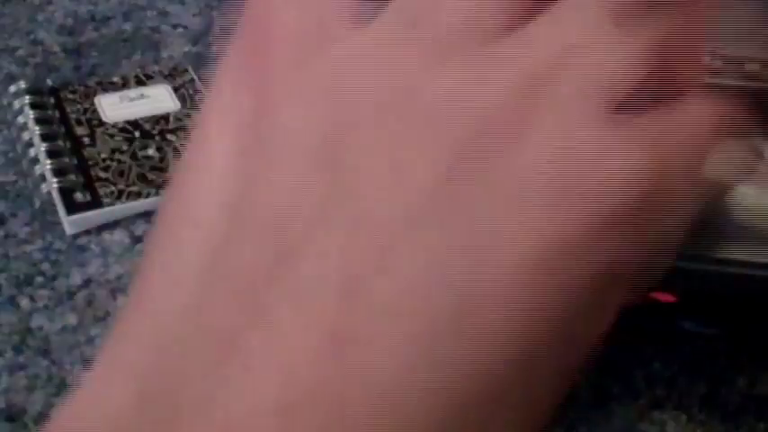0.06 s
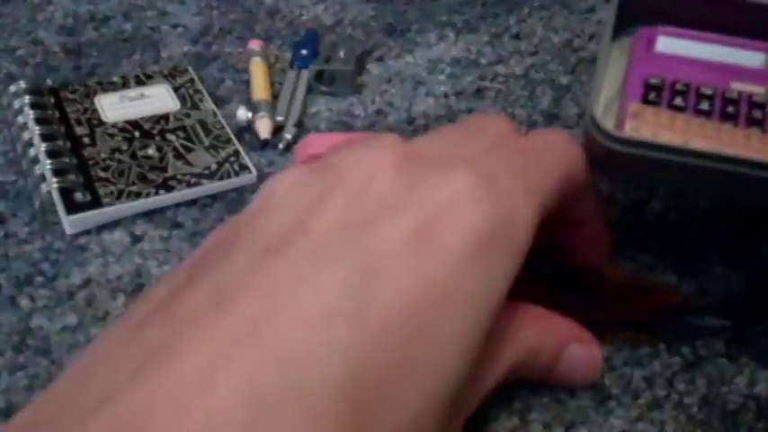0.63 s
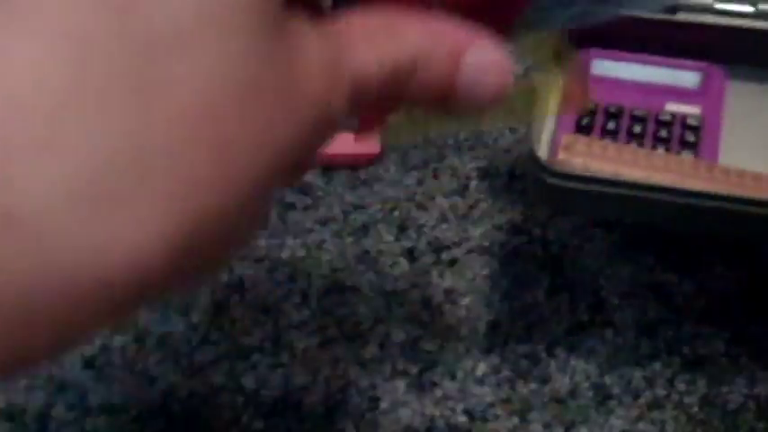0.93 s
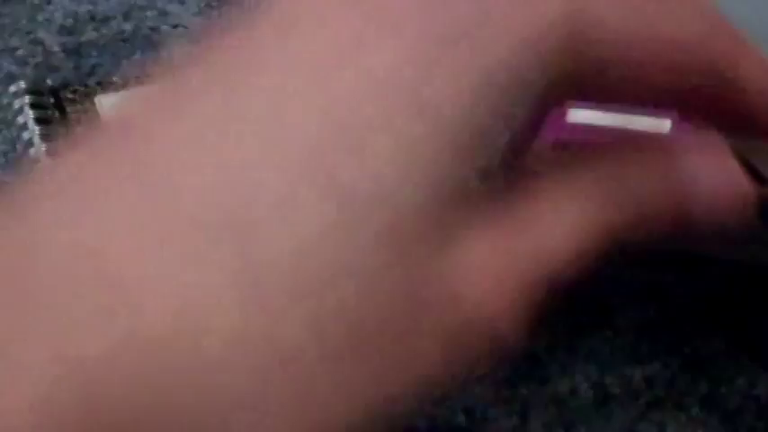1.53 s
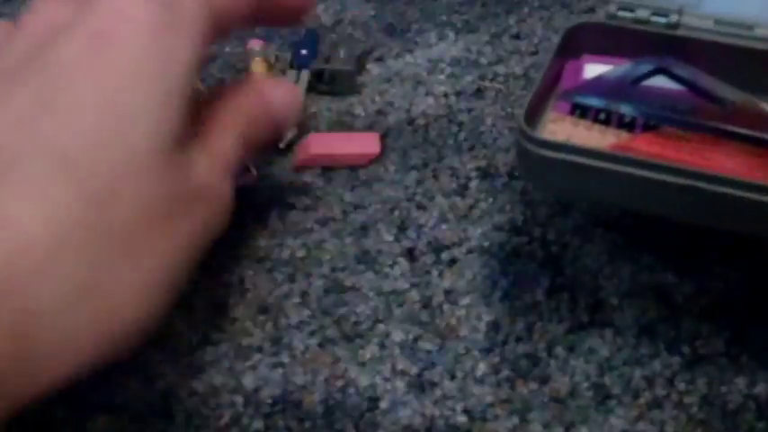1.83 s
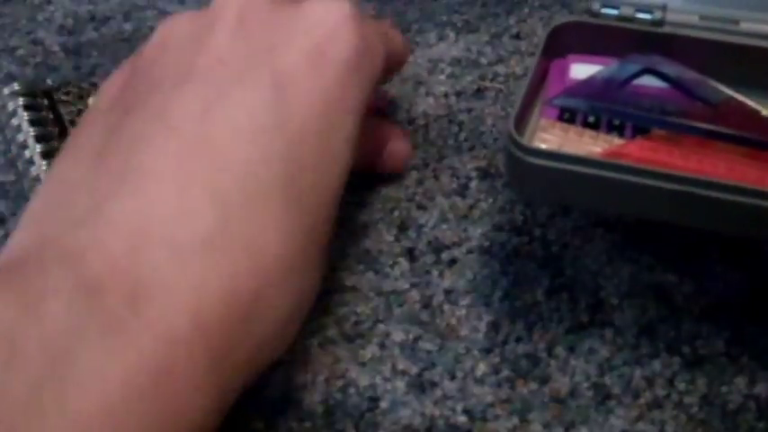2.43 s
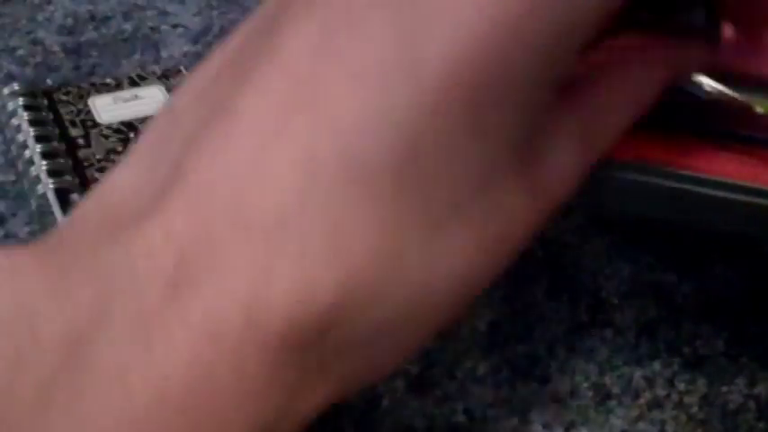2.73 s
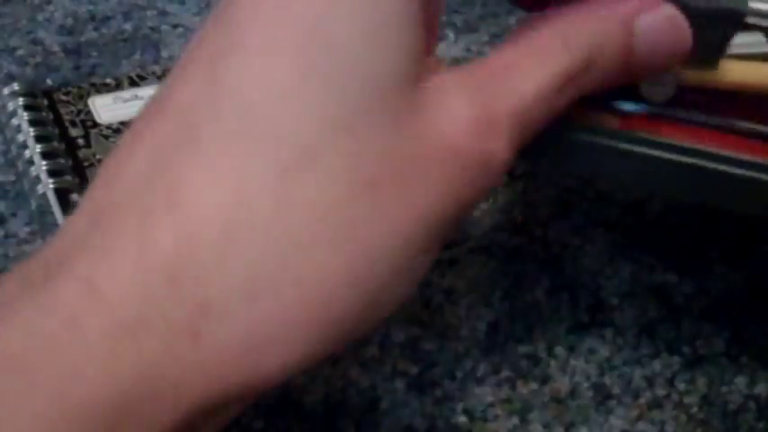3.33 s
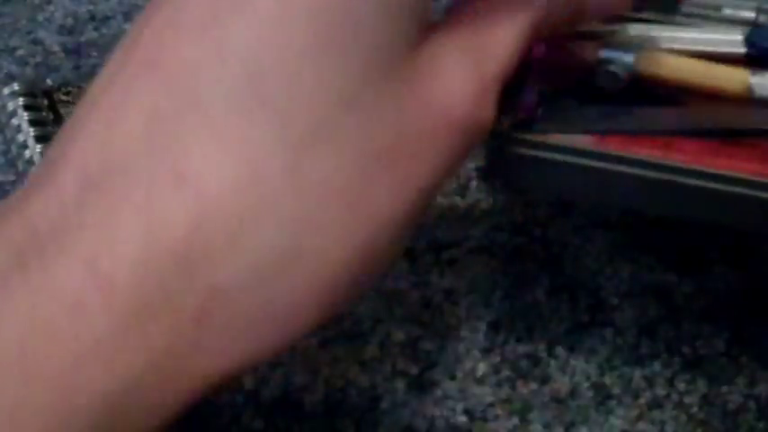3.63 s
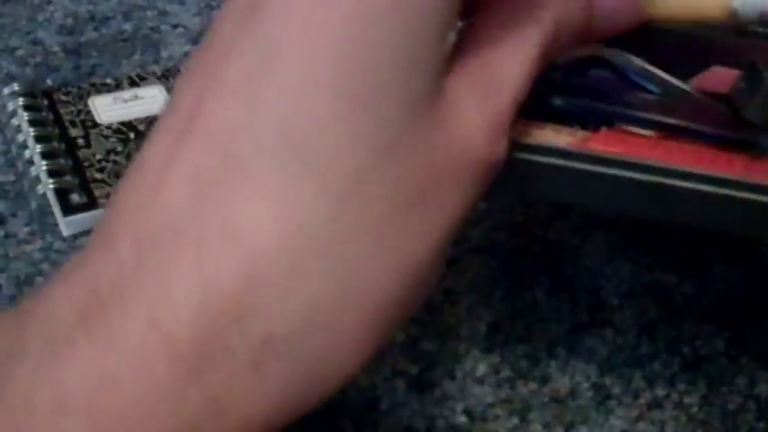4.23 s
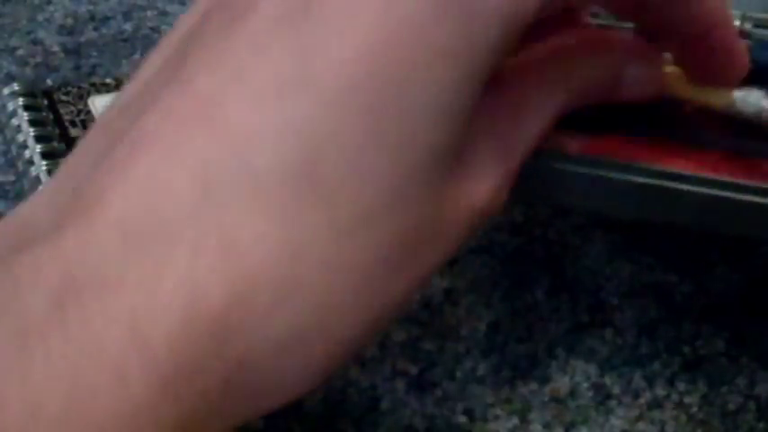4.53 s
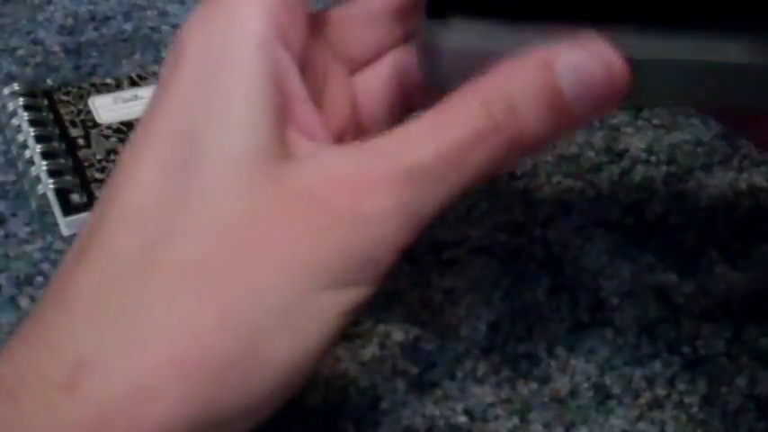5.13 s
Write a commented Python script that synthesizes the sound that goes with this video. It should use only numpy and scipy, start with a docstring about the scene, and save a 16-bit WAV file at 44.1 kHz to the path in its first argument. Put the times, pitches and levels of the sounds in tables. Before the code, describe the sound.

Small plastic toys clatter into a little tin on carpet, very close and slightly to the right, over a faint hiss. A first burst of sharp clicks and rattles comes from 0.1 to 0.4 seconds, with a short hollow ring and a soft low bump. More clusters land at about 0.9 seconds, from 1.0 to 1.3, and from 1.6 to 1.8. In the lull that follows, tiny parts tick brightly in the fingers between 2.0 and 2.2 seconds, with a barely audible brush of hand on carpet. From 2.7 to about 4.7 seconds the pieces click, bounce, scrape and jostle in a busy, uneven run, sounding a little more muffled as the tin fills. A few light knocks and a final click come between 5.0 and 5.2 seconds. The room is dry, and the hiss dips slightly after each clatter.

```python
"""Over a faint hiss, miniature plastic stationery toys clatter into a small hinged tin on a carpet.
A hand drops them in and shuffles them into place: each contact rattles a toy and rings the tin, which
the growing heap muffles. Toys rebound, scrape and jostle, and the tin rings on after some hits.
Tiny parts picked up beside it tick brightly. The camera is close, with the tin to the right of its two
microphone ports. The hiss is its own, and its noise suppressor pulls it down after each clatter."""
import sys
import numpy as np
from scipy import signal
from scipy.fft import rfft, irfft, next_fast_len
from scipy.io import wavfile
from scipy.ndimage import uniform_filter1d, map_coordinates

SR = 44100
rng = np.random.default_rng(int(sys.argv[2]) if len(sys.argv) > 2 else 0)


def to_wav(s):
    """Save 16-bit WAV."""
    ch = np.atleast_2d(s).T  # columns
    pcm = np.round(np.clip(ch, -1, 1) * 32767)  # PCM
    wavfile.write(sys.argv[1], SR, pcm.astype(np.int16))


N = 228173

# spectrum of microphone hiss and room rumble: f/Hz, relative level/dB
HISS_SPECTRUM = [(25, -1), (100, 0.5), (200, -1.5), (600, -2), (1600, -5), (10500, -6.5), (12800, -1),
                 (14200, -4.5)]
# likeness of that noise at the two ports: f/Hz, correlation
HISS_CORRELATION = [(60, 0.93), (300, 0.21), (7000, 0.12)]
# faint whine of nearby electronics: f/Hz, level/dB
WHINE_TONES = [(7870, -70), (11806, -77)]
# toys striking the tin and each other; the rows at 0.723 s and 0.802 s are tiny parts ticking in the fingers,
# and the one at 5.044 s is the hand knocking on the tin: t/s, relative clack level/dB, snap re clack/dB, toy's
# f/Hz, rattle t60/s, flight/s if it rebounds
TOY_CONTACTS = [(.095, -32.5, 0, 6470, .011), (.104, -31.5, -14, 1960, .053), (.1165, -24, 10, 5760, .013),
                (.1196, -22.5, -22, 5770, .012), (.208, -40.5, -13, 2280, .05),
                (.2364, -46, -15, 1970, .05), (.249, -37, 0, 2390, .027), (.289, -25.5, -12, 2860, .031),
                (.2995, -32.5, -3, 2250, .056), (.312, -29, -12, 2230, .07),
                (.334, -30, 0, 1920, .043, .013), (.723, -54, 14, 4400, .008), (.802, -52.5, 9, 4950, .009),
                (.8674, -30.5, 8, 4550, .008), (.8756, -22, -8, 1960, .03), (.8805, -31, 14, 4800, .017),
                (.896, -26, -11, 2360, .058), (.919, -31.5, -7, 4600, .016, .006),
                (1.042, -42.5, 3, 2200, .032), (1.058, -35, -10, 2170, .031), (1.109, -33, -6, 1950, .037),
                (1.1156, -39.5, 10, 5150, .008), (1.145, -38, 2, 1750, .026), (1.156, -38.5, 0, 1880, .055),
                (1.179, -26.5, 5, 5640, .025), (1.2, -27, -5, 6400, .04), (1.2264, -24, 8, 5700, .024),
                (1.2456, -36.5, 5, 7000, .013), (1.282, -47.5, 0, 6800, .03), (1.594, -26.5, 1, 4140, .032),
                (1.651, -29.5, -4, 5400, .055, .028), (1.703, -35, -5, 5030, .025),
                (1.7425, -55, -13, 2010, .018), (1.788, -37, -5, 2900, .004),
                (1.804, -45, 0, 2900, .016, .011), (2.175, -48, 5, 4500, .005, .006),
                (2.666, -29.5, -12, 3500, .027), (2.675, -34, -10, 2620, .05),
                (2.773, -35.5, 3, 4970, .022), (2.803, -32, -17, 1820, .013), (2.819, -34.5, 3, 2480, .015),
                (2.849, -32, -1, 2440, .029), (2.863, -23.5, 0, 5850, .026, .019),
                (2.904, -35.5, -4, 2290, .026), (3.092, -26, 4, 3480, .012), (3.187, -37, 1, 6830, .04),
                (3.34, -26, 3.5, 3110, .019), (3.369, -36.5, 0, 3120, .03, .009),
                (3.492, -34, -7, 3330, .017), (3.5225, -27.5, -1, 5060, .029),
                (3.573, -34, -12, 2850, .06, .008), (3.634, -46, -5, 2220, .011),
                (3.7885, -25.5, 4, 6240, .03, .008), (3.834, -37.5, -8, 3130, .017),
                (3.846, -31.5, 2, 4470, .045), (3.8556, -21, -4, 1950, .014),
                (3.875, -46.5, 2, 3370, .027, .015), (3.9105, -34, -2, 3300, .04),
                (3.958, -33.5, 5, 3320, .009, .014), (3.999, -38.5, -7, 3260, .045),
                (4.025, -34, -9, 4700, .044, .02), (4.1215, -24, 2, 3300, .03, .019),
                (4.167, -29.5, 0, 3180, .03, .024), (4.241, -29, -6, 3500, .035),
                (4.248, -28, -19, 3840, .011), (4.3534, -24, -20, 3270, .017), (4.3565, -24, 0, 4460, .04),
                (4.402, -41, -20, 3330, .013), (4.416, -30.5, -4, 3160, .02), (4.487, -41, -7, 2720, .04),
                (4.5006, -33, 7, 7080, .01), (4.554, -29.5, -7, 2300, .027, .022),
                (4.591, -38.5, -2, 3350, .032), (4.7, -41.5, -5, 2590, .04, .017),
                (4.801, -50, -22, 2900, .021), (5.044, -46, -4, 1400, .07), (5.056, -42, -11, 1750, .025),
                (5.169, -29.5, -5, 1450, .008)]
# resonances of the tin: f/Hz, width/Hz, relative level/dB
TIN_MODES = [(470, 43, -16), (810, 230, -20.5), (1193, 140, -1), (1937, 246, -9.5), (2390, 194, -10.5),
             (2767, 390, -11), (3483, 430, -7.5), (4370, 580, -8.5), (5285, 290, -9), (6040, 150, -22.5)]
# the heap growing in the tin: t/s, fullness from 0 to 1
TIN_FULLNESS = [(1, 0), (4, 1)]
# toys hitting the tin's bare wall or floor, and at 5.046 s the hand knocking on it: t/s, level/dB, t60/s
WALL_KNOCKS = [(.0955, -53, .015), (.118, -45, .009), (.14, -57, .16), (.289, -53, .03), (.897, -54, .04),
               (1.058, -57, .035), (1.278, -64, .12), (1.652, -50, .055), (2.773, -58, .02),
               (2.819, -56, .02), (2.848, -54, .03), (3.34, -54, .015), (3.5225, -49.5, .03),
               (3.834, -59, .02), (4.125, -55, .05), (5.046, -58, .07), (5.169, -56, .02)]
# firm pushes of the tin against the carpet: t/s, level/dB
CARPET_THUMPS = [(0.1172, -33.5), (1.177, -42), (1.226, -29.5), (1.595, -53), (3.34, -33.5)]
# toys scraping and jostling, and the tin ringing on after hits:
# start/s, end/s, clack level/dB, snap re clack/dB
SCRAPES_AND_RING_TAILS = [(.135, .19, -57, -12), (.195, .29, -56, -10), (.28, .356, -38, -18),
                          (.35, .385, -51, -15), (.74, .815, -63.5, 11), (.895, .943, -46, -17),
                          (1.045, 1.125, -57, 3), (1.125, 1.229, -41, -5), (1.24, 1.321, -56, -20),
                          (1.369, 1.396, -59, 10), (1.645, 1.72, -52, -5), (2.205, 2.235, -53, 4),
                          (2.657, 2.689, -48, 8), (3.167, 3.198, -39, -3), (3.42, 3.62, -50, -3),
                          (3.92, 4.048, -51, -12), (4.011, 4.042, -39.5, -1), (4.106, 4.239, -45.5, -13),
                          (4.48, 4.62, -54, -12), (4.985, 5.009, -54.5, 3), (5.02, 5.16, -59, -17)]
# tiny hard parts ticking together in the fingers: t/s, level/dB
PART_TICKS = [(.4905, -55), (2.03, -31), (2.1565, -40), (2.170, -42), (2.218, -45.5)]
# resonances of those parts: f/Hz, width/Hz, relative level/dB
PART_MODES = [(9100, 500, 0), (13300, 800, 1)]
# the hand brushing the carpet: centre t/s, half length/s, level/dB
HAND_BRUSHES = [(0.75, 0.22, -59), (2.137, 0.17, -56.5), (2.492, 0.028, -58.5)]
# the left port faces away from the tin: f/Hz, left minus right/dB
PORT_SHADOW = [(300, -3), (1000, -1), (5000, -1.2), (8000, -2), (13000, -5)]

BAND_LIMIT_HZ = 14300
# (empty, full): a full tin loses low resonance, knock and the top of the snap
HEAP_RING_DB, HEAP_KNOCK_DB, HEAP_TOP_DB = (3, -5), (-15, -19), (1, -2)
# contacts softer than a typical one are duller: dB of extra knock per dB of lost clack
TYPICAL_DB, SOFT_KNOCK = -33, .45


def amp(db):
    """Decibels to gain."""
    return 10 ** (np.asarray(db) / 20)


def unit(x):
    """Scale to rms 1."""
    return x / np.sqrt(np.mean(x ** 2) + 1e-20)


def along(points, hz):
    """Read (f/Hz, value) points on a log frequency axis."""
    f, values = np.transpose(points)
    return np.interp(np.log(hz + 1), np.log(f + 1), values)


def filtered(x, response):
    """Filter x by a complex response of frequency."""
    n = x.shape[-1]
    padded = next_fast_len(n + SR // 20)
    f = np.fft.rfftfreq(padded, 1 / SR)
    return irfft(rfft(x, padded) * response(f), padded)[..., :n]


def add(track, s, sound):
    """Mix a sound into a track from time s on."""
    span = track[..., max(round(s * SR), 0):][..., :sound.shape[-1]]
    span += sound[..., :span.shape[-1]]


def resonance(f, hz, width):
    """One causal resonance with peak gain 1."""
    return 1j * f * width / (hz * hz - f * f + 1j * f * width)


def lowpass(ratio, order):
    """Causal Butterworth response at ratio = f / edge; ratio = -edge / f gives the high-pass."""
    poles = np.exp(1j * np.pi * (2 * np.arange(order) + order + 1) / (2 * order))
    return 1 / np.prod(1j * ratio[:, None] - poles, axis=1)


def noise_floor(hiss_db=-56):
    """Microphone hiss over a little room rumble, with a thin whine from nearby electronics."""
    def mid_and_side(f):
        angle = np.arccos(np.clip(along(HISS_CORRELATION, f), -1, 1)) / 2
        colour = (f < BAND_LIMIT_HZ) * amp(along(HISS_SPECTRUM, f))
        return colour * [np.cos(angle), np.sin(angle)]
    t = np.arange(N) / SR
    mid, side = filtered(rng.standard_normal((2, N)), mid_and_side)
    whine = sum(amp(db) * np.sqrt(2) * np.sin(2 * np.pi * hz * t) for hz, db in WHINE_TONES)
    return amp(hiss_db) * unit(np.array([mid + side, mid - side])) + whine


def blows(rebound_loss_db=8.5):
    """Every contact, and its weaker rebound if it has one."""
    for s, db, snap_db, hz, t60, *flights in TOY_CONTACTS:
        yield s, db, snap_db, hz, t60
        for flight in flights:
            yield s + flight, db - rebound_loss_db, snap_db, hz, t60


def chatter(count, knots_per_s):
    """A smooth random curve for the uneven force of micro-bounces."""
    knots = rng.standard_normal(int(count * knots_per_s / SR) + 4)
    return map_coordinates(knots, [np.arange(count) * knots_per_s / SR])


def by_heap(s, empty, full):
    """A value that moves from empty to full as the tin fills."""
    return empty + (full - empty) * np.interp(s, *np.transpose(TIN_FULLNESS))


def toy(f, hz):
    """A small plastic part has one short, hollow resonance."""
    return 1 + amp(8) * resonance(f, hz, width=220)


def tin(f, touch_db=0, direct_db=-12):
    """The tin's resonances over flat direct sound; touch_db weights them by where it is struck."""
    hz, width, db = np.transpose(TIN_MODES)
    return amp(direct_db) + resonance(f[:, None], hz, width) @ amp(db - db.max() + touch_db)


def registers(x, carpet_hz=380, knock_hz=1500, snap_hz=7200):
    """Split into low knock, middle clack and high snap, each of rms 1."""
    def bands(f):
        f = f + 1
        knock = lowpass(-carpet_hz / f, order=2) * lowpass(f / knock_hz, order=4)
        clack = lowpass(-knock_hz / f, order=6) * lowpass(f / snap_hz, order=3)
        # the microphone ports resonate at the top of the snap
        ports = 1 + 1.5 * resonance(f, hz=13600, width=1700)
        snap = lowpass(-snap_hz / f, order=4) * lowpass(f / BAND_LIMIT_HZ, order=12) * ports
        return np.array([knock, clack, snap])
    return [unit(band) for band in filtered(x, bands)]


def toy_contacts(rise_s=0.00032, settle=1.16, ring_db=-21, ring_t60=0.05, wall_t60=0.0034, gain_db=-10):
    """A contact is a few milliseconds of micro-bounces, coloured by toy and tin, then a weak ring."""
    out, t = np.zeros((2, N)), np.arange(SR // 10) / SR
    floor_modes = np.transpose(TIN_MODES)[0] < 2500  # the low resonances that the heap muffles
    for s, db, snap_db, hz, t60 in blows():
        rattle_noise, ring_noise, wall_noise = rng.standard_normal((3, len(t)))
        bounces = amp(3.5 * chatter(len(t), knots_per_s=1200))
        # the rattle dies ever faster as the toy settles
        rattle = rattle_noise * bounces * amp(-60 * (t / t60) ** settle)
        ring = ring_noise * amp(ring_db - 60 * t / ring_t60)
        force = (rattle + ring) * (1 - np.exp(-t / rise_s))
        touch_db = by_heap(s, *HEAP_RING_DB) * floor_modes + rng.normal(0, 2.5, len(TIN_MODES))
        top_shelf = [(8000, 0), (13000, by_heap(s, *HEAP_TOP_DB))]
        body = filtered(force, lambda f: tin(f, touch_db) * toy(f, hz) * amp(along(top_shelf, f)))
        knock, clack, snap = registers(body)
        knock_db = by_heap(s, *HEAP_KNOCK_DB) + SOFT_KNOCK * (TYPICAL_DB - db)
        hit = amp(db + gain_db) * (clack + amp(knock_db) * knock + amp(snap_db) * snap)
        # the tin's walls scatter each hit differently to the two ports, most of all in the treble
        scatter = wall_noise * amp(-60 * t / wall_t60)
        side = signal.fftconvolve(hit, scatter / np.linalg.norm(scatter))[:len(t)]
        side = filtered(side, lambda f: amp(along([(1000, -14), (12000, -7)], f)))
        add(out, s, np.array([hit + side, hit - side]))
    return out


def wall_knocks(rise_s=.0006, carpet_hz=420, edge_hz=1700):
    """A blunt blow sets only the low resonances of the sheet metal going: a hollow knock."""
    def sheet(f):
        return tin(f) * lowpass(-carpet_hz / (f + 1), order=2) * lowpass(f / edge_hz, order=3)
    out, t = np.zeros(N), np.arange(SR // 5) / SR
    for s, db, t60 in WALL_KNOCKS:
        force = rng.standard_normal(len(t)) * amp(-60 * t / t60) * (1 - np.exp(-t / rise_s))
        add(out, s, amp(db) * unit(filtered(force, sheet)))
    return out


def carpet_thumps(push_s=0.00028, far_port_db=-13):
    """The carpet swallows any ring, leaving one low push, felt mostly at the right port."""
    out, age = np.zeros(N), np.arange(SR // 20) / SR / push_s
    for s, db in CARPET_THUMPS:
        add(out, s, amp(db) * age * np.exp(1 - age))
    return np.array([amp(far_port_db) * out, out])


def scrapes_and_ring_tails(grains_per_s=370, noise_db=-24, knock_db=-12, fade_s=0.0056, side_db=-11):
    """Toys scrape and jostle, and the tin rings on after hits: grainy noise through its resonances."""
    out, t = np.zeros((2, N)), np.arange(N) / SR
    grains = (rng.random((2, N)) < grains_per_s / SR) * rng.standard_normal((2, N))
    noise = amp(noise_db) * rng.standard_normal((2, N))
    body = filtered(grains + noise, tin)
    knock, clack, snap = np.stack([registers(channel) for channel in body], axis=1)
    for start, end, db, snap_db in SCRAPES_AND_RING_TAILS:
        envelope = np.clip(np.minimum(t - start, end - t) / fade_s, 0, 1)
        out += amp(db) * envelope * (clack + amp(knock_db) * knock + amp(snap_db) * snap)
    mid, side = out
    return np.array([mid + amp(side_db) * side, mid - amp(side_db) * side])


def part_ticks(crack_t60=0.0088, direct_db=-28, edge_hz=8000):
    """Beside the tin, a very short crack rings a tiny part's two high resonances."""
    def part(f):
        direct = amp(direct_db) * 1j * f / (edge_hz + 1j * f)
        return direct + sum(amp(db) * resonance(f, hz, width) for hz, width, db in PART_MODES)
    out, t = np.zeros(N), np.arange(SR // 20) / SR
    for s, db in PART_TICKS:
        crack = rng.standard_normal(len(t)) * amp(-60 * t / crack_t60)
        add(out, s, amp(db) * unit(filtered(crack, part)))
    return out


def hand_brushes(pile_hz=900):
    """Skin on carpet pile makes a soft, dull swell."""
    t = np.arange(N) / SR
    swell = sum(amp(db) * np.exp(-((t - s) / half) ** 2) for s, half, db in HAND_BRUSHES)
    friction = filtered(rng.standard_normal(N), lambda f: resonance(f, pile_hz, width=4 * pile_hz))
    return swell * unit(friction)


def room(x, t60=0.11, wet_db=-24, build_s=0.008, dull_hz=5000):
    """The carpeted room answers faintly and briefly."""
    t = np.arange(SR // 4) / SR
    tail = rng.standard_normal((2, len(t))) * amp(-60 * t / t60) * (1 - np.exp(-t / build_s))
    wet = signal.fftconvolve(x, tail / np.linalg.norm(tail[0]), axes=1)[:, :N]
    return amp(wet_db) * filtered(wet, lambda f: 1 / (1 + 1j * f / dull_hz))


def scene(lag_s=.000044):
    """The tin sits close on the right: the left port hears it duller, and all sound gets there later."""
    sides = np.array([[1], [-1]])
    close = toy_contacts() + wall_knocks() + scrapes_and_ring_tails() + carpet_thumps()
    close = close + part_ticks() + hand_brushes()
    shaded = filtered(close, lambda f: amp(sides * along(PORT_SHADOW, f) / 2))
    at_ports = shaded + room(shaded) + noise_floor()
    return filtered(at_ports, lambda f: np.exp(-1j * np.pi * f * lag_s * sides))


def suppressor(x, window_s=.02, memory_s=.11, ratio=.55, margin_db=6.5, depth_db=5.5):
    """Whatever falls well below the recent average level counts as noise and is turned down."""
    power = np.abs(uniform_filter1d(np.mean(x ** 2, axis=0), round(window_s * SR)))
    level_db = 10 * np.log10(power + 1e-12)
    level_db = level_db - level_db[0]
    keep = np.exp(-1 / (memory_s * SR))
    recent_db = signal.lfilter([1 - keep], [1, -keep], level_db)
    cut_db = np.clip(ratio * (recent_db - level_db - margin_db), 0, depth_db)
    return x * amp(-cut_db)


def record(dry, ceiling=.9):
    """The camera ducks its hiss after a clatter, rounds hard peaks and cuts off above its band limit."""
    ducked = suppressor(dry)
    rounded = ducked / (1 + np.abs(ducked / ceiling) ** 4) ** (1 / 4)
    edge_hz, edge_db = [BAND_LIMIT_HZ, 14600, 16400, 16600], [0, -16, -38, -120]
    return filtered(rounded, lambda f: amp(np.interp(f, edge_hz, edge_db)))


dry = scene()
out = record(dry)
to_wav(out)
```